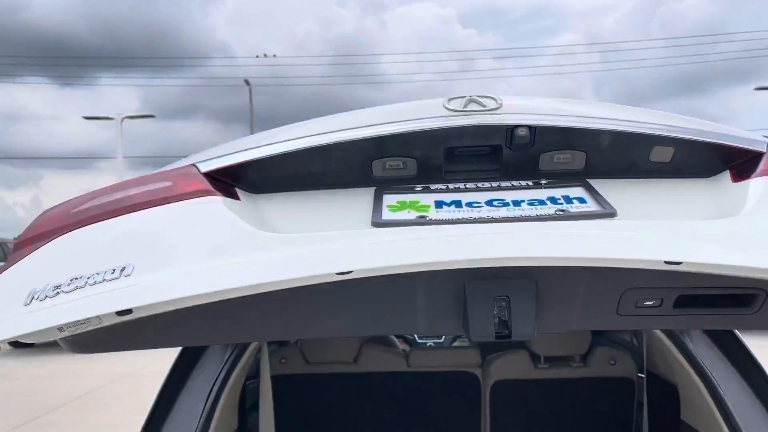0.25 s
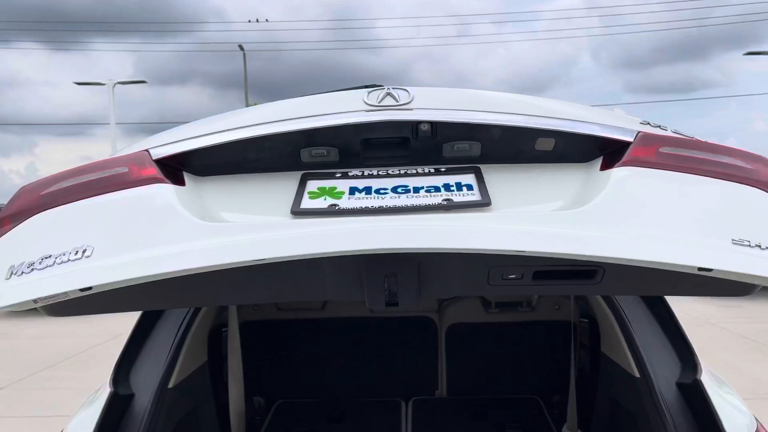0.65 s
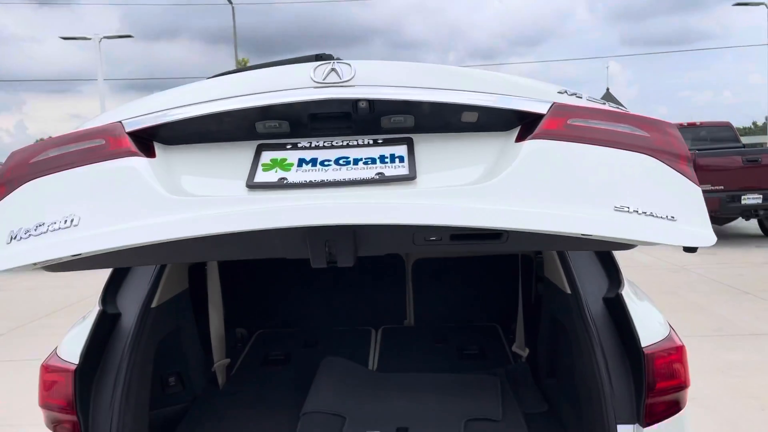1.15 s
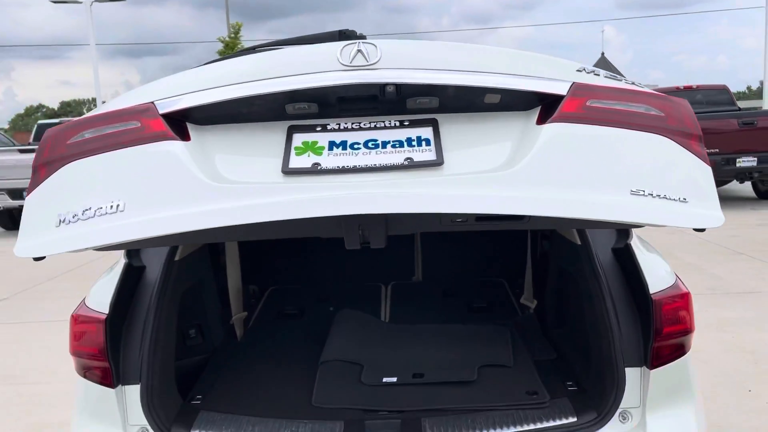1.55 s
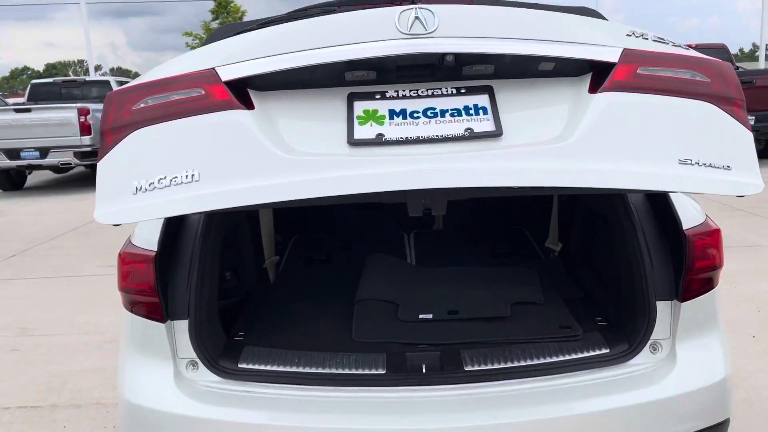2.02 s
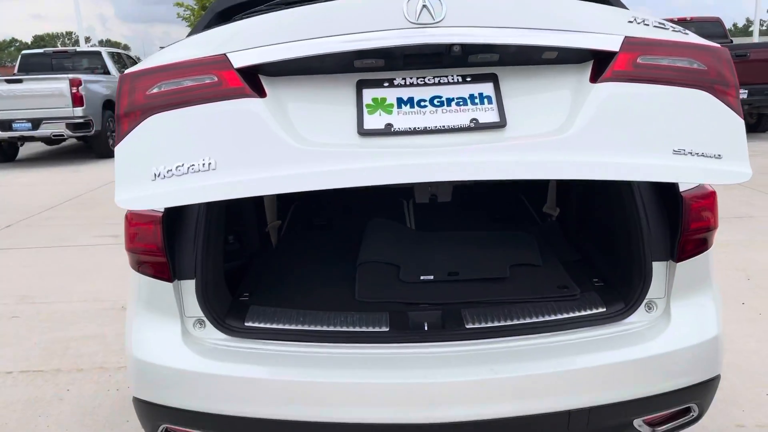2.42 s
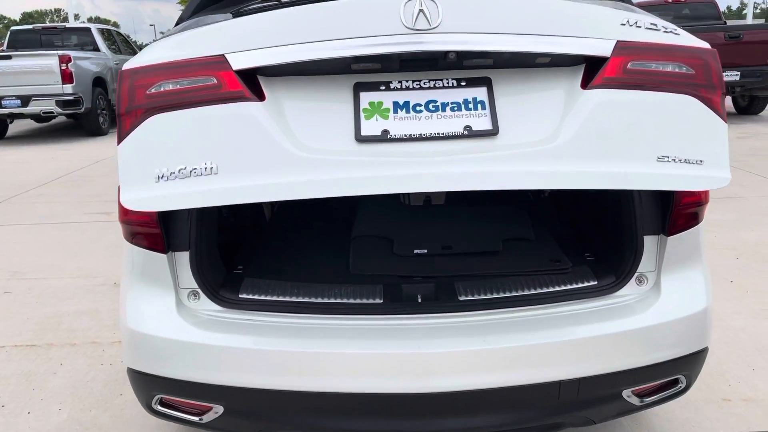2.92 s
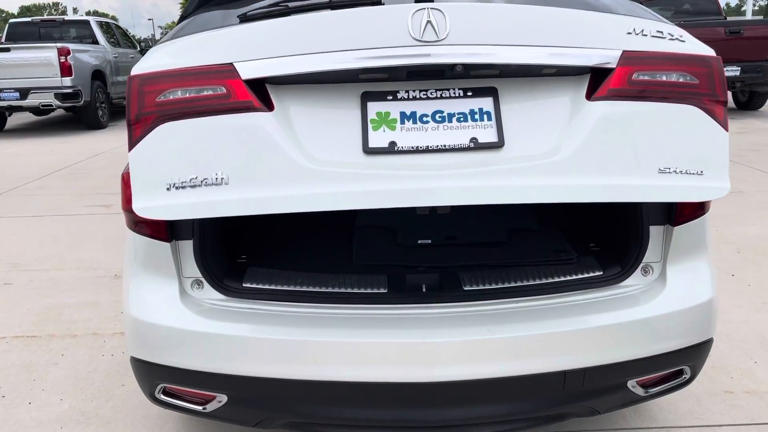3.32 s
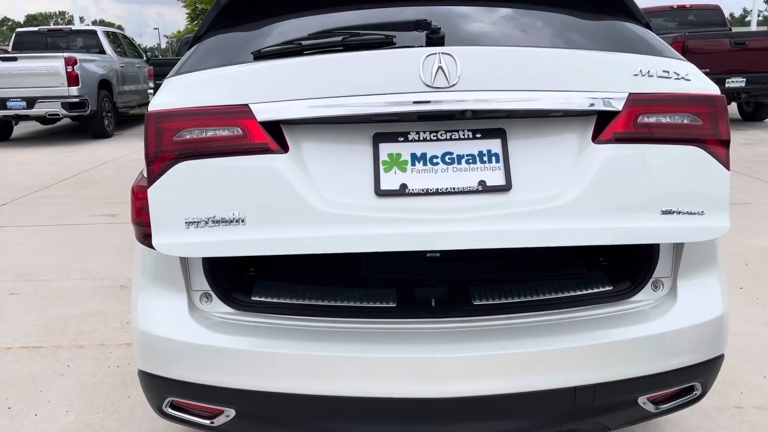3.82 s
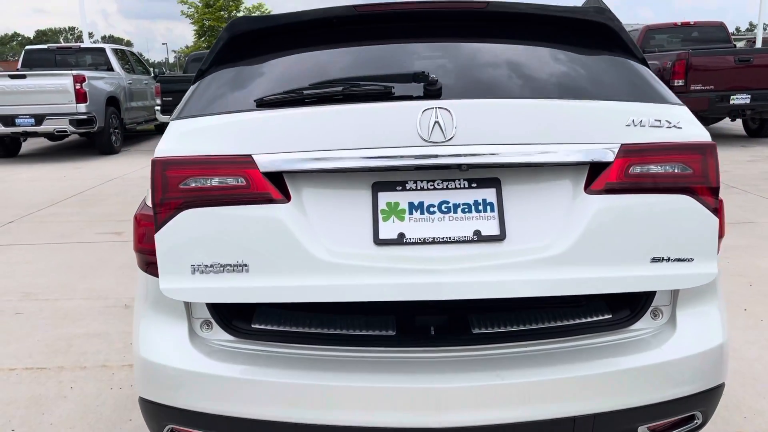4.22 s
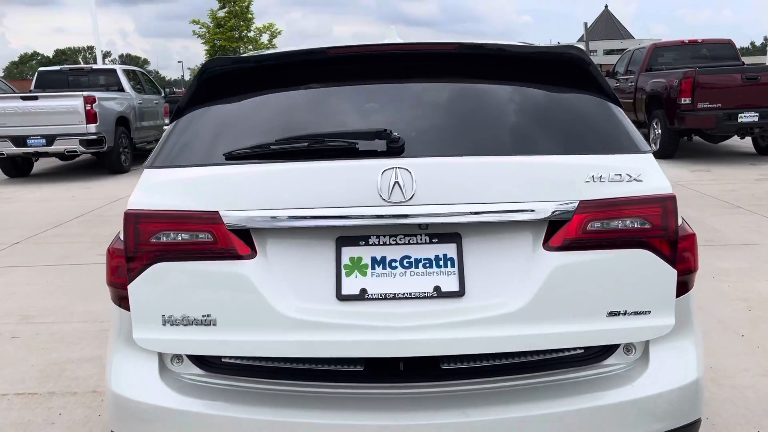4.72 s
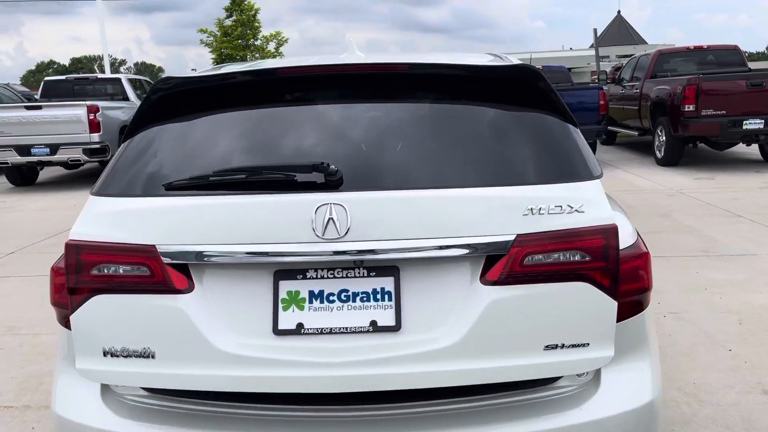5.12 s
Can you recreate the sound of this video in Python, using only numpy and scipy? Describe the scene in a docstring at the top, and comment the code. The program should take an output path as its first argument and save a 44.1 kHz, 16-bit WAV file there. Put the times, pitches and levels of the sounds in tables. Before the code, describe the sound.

The sound opens at once on a deep, smooth engine hum around 110 Hz, strongest in the first moments and gently booming. Between about 1.1 and 1.5 s it settles to a lower pitch, then from 1.9 s fades away by around 2.5 s. Beneath it a power tailgate descends with a soft, slightly shaky whir near 220 Hz, rising a little around 3.7 s, and a faint, very high whine whose side tones draw together as the motor slows. A tiny bright metallic tink flickers at 1.73 s. From 2.4 s distant tyre roar, hollow and midrange, becomes prominent, surging until about 3.7 s, dipping near 4.3 s and returning towards the end. Short rubs occur around 3.1 and 3.8 s; dry rustles and slightly stronger gear rasp follow from 4.3 to 5.2 s. Low throbs, traffic rumble and outdoor hiss continue; no closing thud is heard.

```python
"""First comes the hum of a six-cylinder engine: harmonics of its crankshaft, which drop in speed and fade.
A power tailgate lowers in an open-air car lot: resonant noise and an unsteady tone form its soft whir,
and side tones around a thin switching whine close in as the motor slows; narrow noises rub and rustle.
One bright metallic tink is a handful of contacts ringing in decaying partials. Behind, moving bands of
noise are tyres on the road, over low hums and throbs, faint tones, and a rumble and hiss of shaped noise."""
import sys
import numpy as np
from scipy import signal
from scipy.fft import rfft, irfft, next_fast_len
from scipy.io import wavfile
from scipy.ndimage import uniform_filter1d, map_coordinates

SR = 44100
rng = np.random.default_rng(int(sys.argv[2]) if len(sys.argv) > 2 else 0)


def to_wav(s):
    """Save 16-bit WAV."""
    ch = np.atleast_2d(s).T  # columns
    pcm = np.round(np.clip(ch, -1, 1) * 32767)  # PCM
    wavfile.write(sys.argv[1], SR, pcm.astype(np.int16))


N = 236101

# whir of the drive: pitch, its rise, middle and length of the rise, level before swells
WHIR_HZ, WHIR_RISE_HZ, RISE_AT_S, RISE_S, WHIR_DB = 219.5, 19, 3.75, 1.1, -50
SHUDDER_WIDTH_HZ = 13
# swells of the whir in the hatch panel: (time [s], length [s], gain [dB])
WHIR_SWELLS = [(.06, 0.27, 12), (.5, 0.13, 8), (2.4, 0.25, 4), (3.1, 0.14, 6.5), (3.42, 0.13, 9.5),
               (3.62, 0.1, 13.5), (3.85, 0.17, 8.5), (4.3, 0.11, 5), (4.82, 0.19, 8.5)]
# resonances of the gear housing: (centre [Hz], half-width [Hz], relative level [dB])
HOUSING_MODES = [(1655, 70, -7), (2290, 350, 2.5)]
# rasp of the gears, early and late in the travel: levels, middle and length of the change
RASP_DB, RASP_LATE_DB, RASP_AT_S, RASP_S = -52.5, -47.5, 4.95, 0.74
# commutator ripple of the motor: running and creeping rates, middle and length of the change
RUN_HZ, CREEP_HZ, BRAKE_AT_S, BRAKE_S = 270, 135, 3.4, 1.9
# switching whine: carrier, level before swells, loss at creeping speed
SWITCH_HZ, WHINE_DB, CREEP_LOSS_DB = 10000, -67, 8
# flares of the whine as the load changes: (time [s], length [s], gain [dB])
WHINE_SWELLS = [(.6, .14, 8), (1.13, .14, 5), (1.63, .12, 5), (2.01, .1, 6), (2.3, 0.45, 9),
                (3.29, .12, 10), (3.65, .3, 5)]

# soft rubs of the hatch and short streaks of its gears:
# (time [s], centre [Hz], half-width [Hz], length [s], level [dB])
RUBS_AND_STREAKS = [(0.7, 4320, 303, 0.028, -58), (1.452, 2200, 250, 0.038, -50),
                    (3.132, 1740, 300, 0.033, -42.5), (3.757, 2320, 280, 0.066, -50),
                    (3.781, 1587, 70.4, .06, -50), (4.317, 1434, 50, 0.044, -54),
                    (4.72, 1540, 160, 0.085, -50), (5.157, 2120, 90, .07, -50)]
# rustles of trim and seals: (time [s], length [s], level [dB])
RUSTLES = [(1.01, .08, -59), (3.18, 0.17, -58), (3.4, .05, -59), (4.348, 0.066, -58), (4.413, .024, -55),
           (4.555, 0.056, -54), (4.657, 0.057, -62), (5.134, .05, -55.5)]
# colour of the rustles: (frequency [Hz], relative level [dB per Hz])
RUSTLE_SPECTRUM = [(2500, -19), (4500, -2), (6200, 0), (7000, -9), (8000, 4.5), (9300, -4), (11500, -4)]
# contacts of a light metal part: (time [s], level before a common cut [dB])
TINKS = [(1.733, -41), (1.7416, -40), (1.768, -48), (1.784, -51), (1.808, -54)]
# partials of the metal part: (frequency [Hz], relative level [dB], 60 dB decay time [s])
METAL_MODES = [(8450, -6, 0.042), (8840, -1, 0.087), (8910, -8, .04)]

# partials of the engine: (multiple of the crankshaft rate [1], relative level [dB])
ENGINE_ORDERS = [(2, -18), (3, 5), (5, -31), (6, -33.5), (8, -25)]
FIRINGS_PER_TURN = 3
# firing rates at the fast and the slower idle, middle and length of the change
FAST_HZ, SLOW_HZ, EASE_AT_S, EASE_S = 110.2, 94.4, 1.3, 0.388
# base level of the engine, loss at the slower idle, start and slope of the final fade
ENGINE_DB, SLOW_LOSS_DB, FADE_AT_S, FADE_DB_PER_S = -26.5, 4, 1.917, 44
# booms and sags of the firing note, and one brief chance dip from interference:
# (time [s], length [s], gain [dB])
BOOMS_AND_DIPS = [(.02, 0.12, 8.5), (.37, 0.21, -3), (.89, 0.096, 6), (1.11, 0.14, 3.5), (1.38, 0.027, -13)]

# tyre roar of the passing traffic: (time [s], tread pitch [Hz], level before surges and mixing [dB])
ROAD = [(0, 885, -50), (.4, 943, -51.5), (.7, 1160, -46), (.95, 1150, -47.5), (1.25, 980, -53),
        (1.85, 970, -49), (2.25, 930, -50), (2.55, 925, -42), (2.8, 930, -42), (2.999, 935, -42.5),
        (3.3, 905, -42), (3.6, 885, -42.5), (3.75, 860, -45), (3.999, 825, -45.5), (4.3, 815, -52),
        (4.5, 819, -45), (5.05, 833, -43.5), (5.35, 812, -42)]
# uneven surges of the roar: (time [s], length [s], gain [dB])
ROAD_SURGES = [(2.42, 0.047, 4), (2.63, .045, 4.5), (2.73, 0.023, 5), (2.84, 0.069, 5.5),
               (3.57, 0.071, 0.5), (5.03, 0.035, 4)]
# brief singing of a tread: (time [s], length [s], pitch [Hz], level [dB])
TREAD_SONGS = [(3.89, .06, 814, -51), (4.06, 0.14, 790, -50.5), (4.52, 0.093, 797, -49)]
# farther tyres: centre and mean level; then half-widths of the near tyres' core and skirt
FAR_ROAD_HZ, FAR_ROAD_DB = 900.6, -48
CORE_WIDTH_HZ, SKIRT_WIDTH_HZ = 55, 260

# faint steady tones near the engine's weaker orders: (pitch [Hz], level [dB], gain of a full swell [dB])
FAINT_TONES = [(69.83, -43.5, 1), (179, -53.5, 11.5), (289.3, -57, 14.5), (438.5, -65.5, 11)]
# common swells of those tones: (time [s], length [s], share of that gain [1])
FAINT_TONE_SWELLS = [(0, 0.11, 0.89), (.35, 0.17, 1.07), (.57, 0.16, 0.58), (.8, 0.086, 1.17)]
# rumble of distant traffic: (frequency [Hz], relative level [dB per Hz])
RUMBLE_SPECTRUM = [(20, -27), (31, -24), (42, 4), (66, 0.5), (84, -1), (105, 3.5), (135, -0.5), (160, -8),
                   (210, -6), (260, -11), (320, -17.5), (400, -22.5), (465, -17), (580, -45), (990, -120)]
RUMBLE_DB = -33
# swells and sags of the rumble: (time [s], length [s], gain [dB])
RUMBLE_SWELLS = [(.13, 0.14, 3.5), (2.35, 0.13, -1.5), (3.39, 0.063, 2), (4.75, 0.61, -1.5)]
# low hums and throbs that come and go, some perhaps from a second strut motor:
# (time [s], length [s], pitch [Hz], level [dB])
HUMS_AND_THROBS = [(2.584, 0.11, 245, -44), (3.02, 0.13, 250, -41), (4.21, 0.54, 91.3, -34.5),
                   (4.85, 0.37, 183, -44), (4.957, 0.11, 62, -32), (5.248, 0.066, 65, -38)]
# outdoor hiss: (frequency [Hz], relative level [dB per Hz])
HISS_SPECTRUM = [(150, -10.5), (300, -5.5), (400, -11.5), (550, -12), (1100, -7), (1700, -9), (2300, -16),
                 (2900, -19), (4000, -24), (4700, -28), (6300, -28.5), (8000, -29.5), (9300, -33),
                 (11200, -34.5)]
# its levels before and after a slight step, middle and length of the step
HISS_DB, HISS_LATE_DB, HISS_AT_S, HISS_S = -41.5, -40.5, 2.96, 0.12

# likeness of the two microphone ports: (frequency [Hz], coherence [1])
PORT_COHERENCE = [(100, 0.96), (250, 0.93), (600, 0.75), (1100, 0.24), (1600, 0.12), (2200, 0.95),
                  (3200, 0.68), (4000, 0.89), (5000, 0.46), (6400, 1), (8000, 1), (11000, 1)]
# phase between the ports: (frequency [Hz], lead of the left one [rad])
PORT_LEAD = [(1000, 0), (1450, -2), (2100, 0.5), (2750, 1.23), (3900, 0.68), (4800, 0.5), (6500, 0.75),
             (7500, 1.3), (8600, -1.5), (9300, 2.5), (9750, -2.5), (10250, -2.5), (10900, -4.5),
             (11400, -4.5)]
TOP_HZ = 11750


def tailgate(shudder_db=-11):
    """Forced vibration and resonance: the drive hums through the panel, its gears rasp in their housing."""
    centre_hz = WHIR_HZ + WHIR_RISE_HZ * swell(RISE_AT_S, RISE_S)
    shudder = amp(shudder_db) * band(centre_hz, SHUDDER_WIDTH_HZ)
    whir = unit(wavering(centre_hz, drift=0.01328, flutter_db=2.0) + shudder)
    rasp = unit(sum(amp(db + 0.85 * wobble(6.4)) * band(hz, width) for hz, width, db in HOUSING_MODES))
    whir_gain = amp(WHIR_DB + swells(WHIR_SWELLS))
    rasp_gain = amp(glide(RASP_DB, RASP_LATE_DB, RASP_AT_S, RASP_S))
    return whir_gain * whir + rasp_gain * rasp + whine()


def whine(fizz_db=-65, fizz_hz=10300):
    """Modulation: commutator ripple puts side tones about the switching tone, over a fine brush fizz."""
    slowed = glide(0, 1, BRAKE_AT_S, BRAKE_S)
    db = WHINE_DB + swells(WHINE_SWELLS) - CREEP_LOSS_DB * slowed
    ripple = phase_of(RUN_HZ + (CREEP_HZ - RUN_HZ) * slowed)
    switch = phase_of(np.full(N, SWITCH_HZ))
    tones = np.sin(switch + ripple) + amp(-9) * np.sin(switch) + amp(-7) * np.sin(switch - ripple)
    singing = amp(db + 1.5 * wobble(18)) * unit(tones)
    fizz = amp(fizz_db) * band(fizz_hz, width_hz=1100)[0]
    # these short waves reach the two ports in opposite phase
    return np.outer([1, -1], singing + fizz)


def rubs_and_streaks():
    """Narrow-band noise: soft rubs of the hatch and short streaks of its gears swell briefly."""
    return sum(amp(db) * swell(s, length) * band(hz, width)
               for s, hz, width, length, db in RUBS_AND_STREAKS)


def rustles(grain_db=5):
    """Granular noise: rapid random gain breaks the rustle of trim and seals into clustered tiny ticks."""
    grains = unit(amp(grain_db * wobble(260)) * rush(RUSTLE_SPECTRUM, patchy_db=2.5))
    return grains * sum(amp(db) * swell(s, length) for s, length, db in RUSTLES)


def tink(attack_s=0.0011, cut_db=3.5):
    """Free vibration: each contact of a small metal part sets off high, exponentially decaying partials."""
    out, t = np.zeros(N), np.arange(SR // 4) / SR
    onset = 1 - np.exp(-t / attack_s)
    for s, db in TINKS:
        ring = sum(amp(level - 60 * t / t60) * np.sin(2 * np.pi * hz * t + random_phase())
                   for hz, level, t60 in METAL_MODES)
        out[round(s * SR):][:len(t)] += amp(db - cut_db) * ring * onset
    return out


def engine(flutter_db=2, rush_db=-29):
    """Harmonic excitation: the firing order hums, weaker orders flutter and the exhaust rushes softly."""
    # the speed and level go 97 % of the way to the slower idle
    eased = glide(0, 0.97, EASE_AT_S, EASE_S)
    shaft = phase_of((FAST_HZ + (SLOW_HZ - FAST_HZ) * eased) / FIRINGS_PER_TURN)
    fade_db = FADE_DB_PER_S * np.maximum(np.arange(N) / SR - FADE_AT_S, 0)
    db = ENGINE_DB - SLOW_LOSS_DB * eased - fade_db
    boom_db = swells(BOOMS_AND_DIPS)
    hum = 0
    for order, level in ENGINE_ORDERS:
        change_db = boom_db if order == FIRINGS_PER_TURN else flutter_db * wobble(5.86)
        hum = hum + amp(level + change_db) * np.sin(order * shaft + random_phase())
    exhaust = amp(db + rush_db + boom_db) * band(680, width_hz=180)
    return amp(db) * hum + exhaust


def faint_tones():
    """Frequency modulation: faint tones near the engine's weaker orders waver slightly and swell together."""
    lift = swells(FAINT_TONE_SWELLS)
    return sum(amp(db + lift_db * lift) * wavering(hz, drift=0.0069, flutter_db=2.0)
               for hz, db, lift_db in FAINT_TONES)


def tyres(roar_db=-3, sing_db=-6.0, tone_db=-11, spray_db=-11):
    """Tread excitation: passing roar moves in level and pitch, with a wide skirt and a wavering core."""
    s, hz, db = np.transpose(ROAD)
    centre_hz, level_db = (np.interp(np.arange(N) / SR, s, column) for column in (hz, db))
    far = amp(FAR_ROAD_DB + .9 * wobble(15)) * band(FAR_ROAD_HZ, width_hz=154)
    roar = amp(roar_db) * band(centre_hz, width_hz=170)
    skirt = amp(spray_db) * band(1.22 * centre_hz, SKIRT_WIDTH_HZ)
    core = amp(sing_db) * band(centre_hz, CORE_WIDTH_HZ)
    tone = amp(tone_db) * wavering(centre_hz, drift=.022, flutter_db=1.5)
    songs = sum(amp(db) * swell(s, length) * wavering(hz, drift=.006, flutter_db=1)
                for s, length, hz, db in TREAD_SONGS)
    passing_gain = amp(level_db + swells(ROAD_SURGES) + 1.36 * wobble(17))
    return far + passing_gain * (roar + skirt + core + tone) + songs


def lot(unrest_db=-0.25):
    """Superposed random sources: traffic rumble with low hums and throbs; returned apart, a broad hiss."""
    rumble_gain = amp(RUMBLE_DB + swells(RUMBLE_SWELLS) + unrest_db * wobble(6.2))
    rumble = rumble_gain * rush(RUMBLE_SPECTRUM, patchy_db=1.0)
    hums = sum(amp(db) * swell(s, length) * band(hz, width_hz=8.5)
               for s, length, hz, db in HUMS_AND_THROBS)
    hiss_gain = amp(glide(HISS_DB, HISS_LATE_DB, HISS_AT_S, HISS_S))
    return rumble + hums, hiss_gain * rush(HISS_SPECTRUM, patchy_db=1.29)


def band(centre_hz, width_hz):
    """Resonance: stereo noise of rms 1 about a centre that may move, at half amplitude width_hz away."""
    a, b = filtered(rng.standard_normal((2, 2, N)), lambda hz: 1 / (1 + (hz / width_hz) ** 2))
    turn = phase_of(centre_hz * np.ones(N))
    return unit(ports(a * np.cos(turn) + b * np.sin(turn)))


def rush(spectrum, patchy_db):
    """Coloured noise: a stereo pair of rms 1 with slow patches of random gain."""
    z = signal.stft(rng.standard_normal((2, N)), nperseg=512)[2]
    field = uniform_filter1d(rng.standard_normal(z.shape[1:]), size=5, axis=0)  # over frequency
    field = uniform_filter1d(field, size=20, axis=1)  # over time
    pair = signal.istft(z * amp(patchy_db * unit(field)), nperseg=512)[1][:, :N]
    return unit(ports(filtered(pair, lambda hz: amp(along(spectrum, hz)))))


def wavering(hz, drift, flutter_db):
    """Frequency and amplitude modulation: a tone of rms 1, a little unsteady in pitch and level."""
    return unit(amp(flutter_db * wobble(6)) * np.sin(phase_of(hz * (1 + drift * wobble(12)))))


def ports(pair):
    """Partial coherence: two unrelated noises are mixed into the partly alike signals of two ports."""
    def mixing(hz):
        turn = np.arccos(np.clip(along(PORT_COHERENCE, hz), 0, .999)) / 2
        return np.array([np.cos(turn), np.sin(turn)])

    common, apart = filtered(pair, mixing)
    return shifted(np.array([common + apart, common - apart]))


def shifted(x):
    """Phase shift: each frequency gets its phase difference between the two ports."""
    return filtered(x, lambda hz: np.exp(.5j * np.outer([1, -1], along(PORT_LEAD, hz))))


def filtered(x, response):
    """Linear filtering: the spectrum of x times a response of frequency."""
    size = next_fast_len(N + SR // 2)
    return irfft(rfft(x, size) * response(np.fft.rfftfreq(size, 1 / SR)), size)[..., :N]


def phase_of(hz):
    """Phase is the running integral of frequency."""
    return 2 * np.pi * np.cumsum(hz) / SR


def random_phase():
    """Incoherence: a random starting phase [rad]."""
    return rng.uniform(0, 2 * np.pi)


def wobble(rate):
    """Random modulation: a smooth curve through rate random knots a second."""
    knots = rng.standard_normal(int(N * rate / SR) + 4)
    return map_coordinates(knots, [np.arange(N) * rate / SR])


def swell(s, length):
    """Gaussian envelope: a smooth bump of height 1 around time s."""
    return np.exp(-2 * ((np.arange(N) / SR - s) / length) ** 2)


def swells(rows):
    """Gains in decibels add: the sum of a table of swells."""
    return sum(height * swell(s, length) for s, length, height in rows)


def glide(start, end, s, length):
    """Sigmoid transition: a smooth change from one value to another around time s."""
    return start + (end - start) * .5 * (1 + np.tanh(2 * (np.arange(N) / SR - s) / length))


def amp(db):
    """Logarithmic level: decibels to amplitude gain."""
    return 10 ** (np.asarray(db) / 20)


def unit(x):
    """Root-mean-square normalization: scale to rms 1."""
    return x / np.sqrt(np.mean(x ** 2) + 1e-20)


def along(points, hz):
    """Logarithmic frequency scale: read (frequency [Hz], value) points along it."""
    f, v = np.transpose(points)
    return np.interp(np.log(hz + 1), np.log(f + 1), v)


def scene():
    """Superposition: hiss, tyres, rubs, streaks and rustles lean a little left; the rest is not panned."""
    rumble, hiss = lot()
    leaning = (hiss + tyres() + rubs_and_streaks() + rustles()) * amp([[.7], [-.7]])
    return tailgate() + tink() + engine() + faint_tones() + rumble + leaning


def record(dry):
    """Band limitation: a 3 ms linear fade-in, then nothing is kept from the band limit upwards."""
    opening = np.minimum(np.arange(N) / (.003 * SR), 1)
    return filtered(dry * opening, lambda hz: hz < TOP_HZ)


dry = scene()
out = record(dry)
to_wav(out)
```